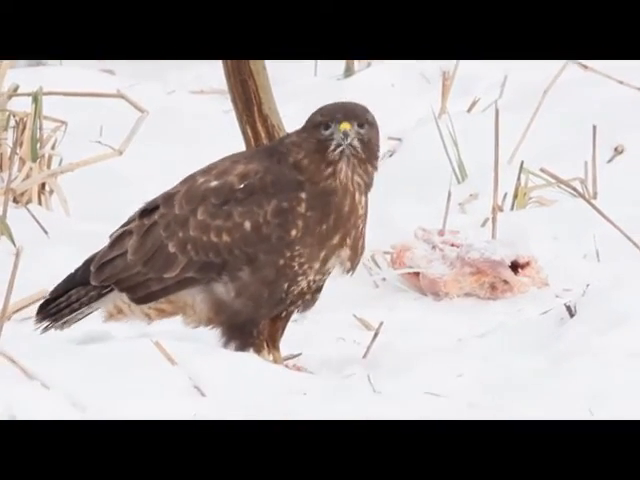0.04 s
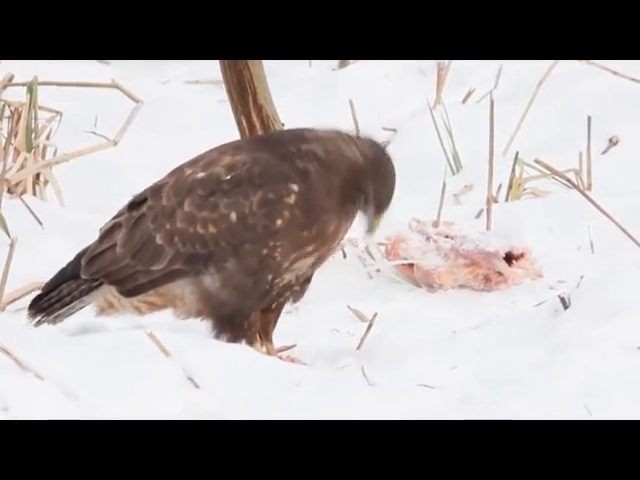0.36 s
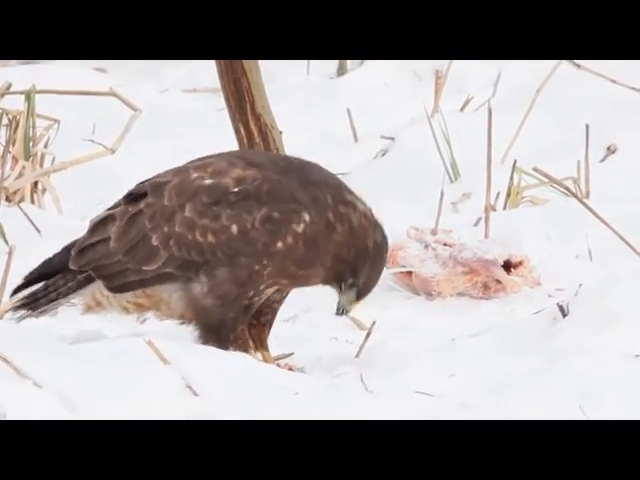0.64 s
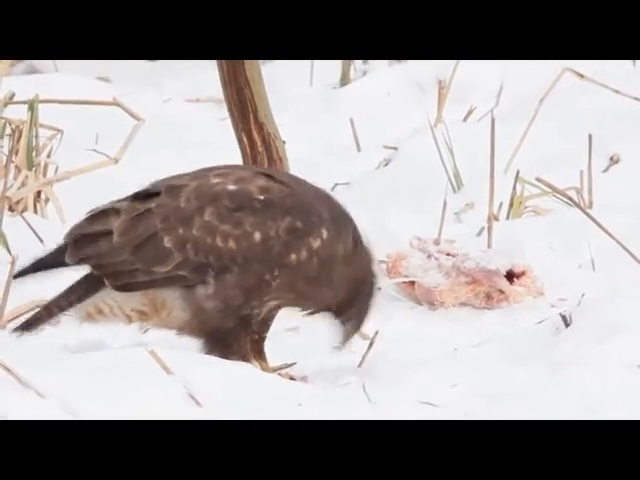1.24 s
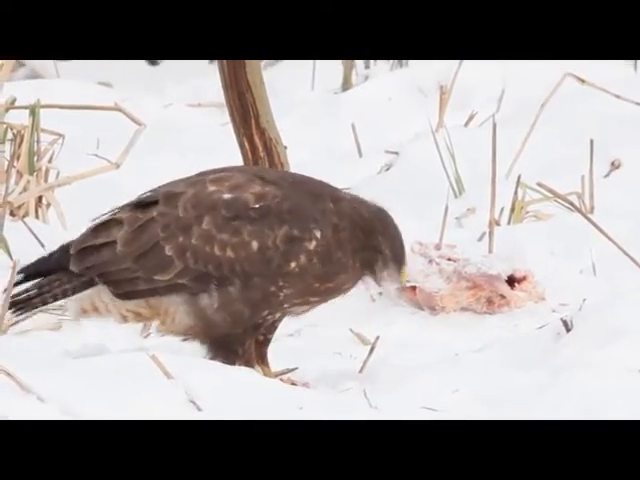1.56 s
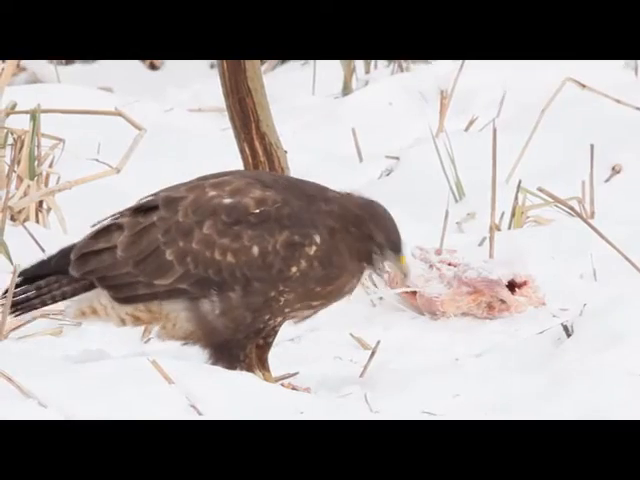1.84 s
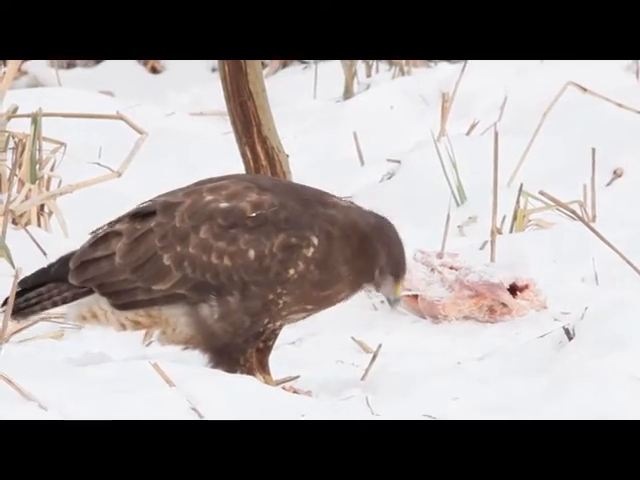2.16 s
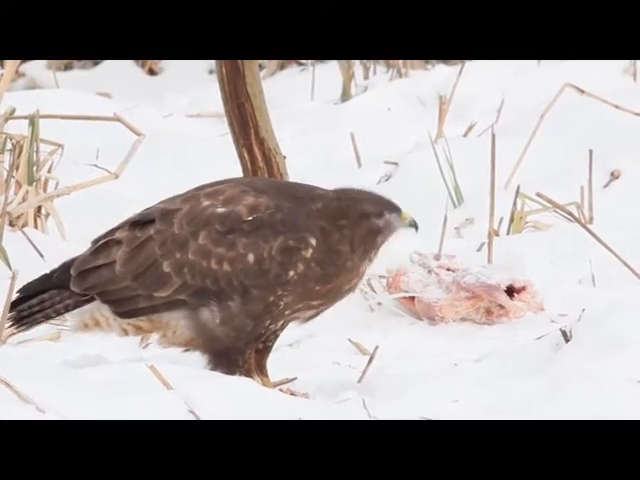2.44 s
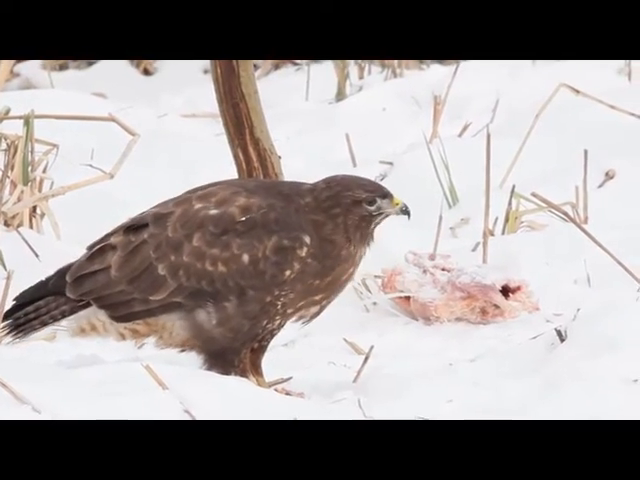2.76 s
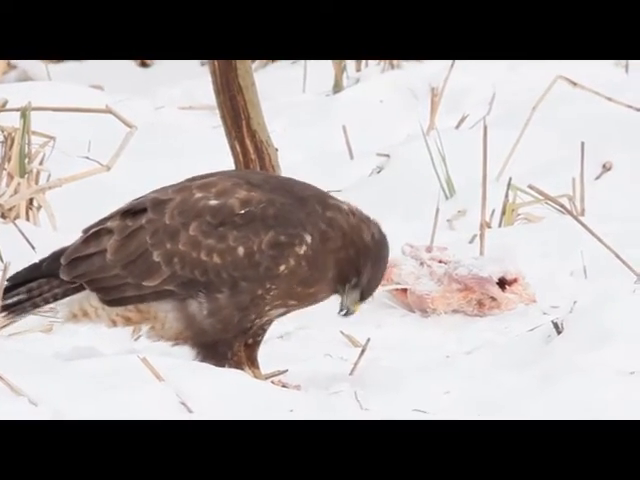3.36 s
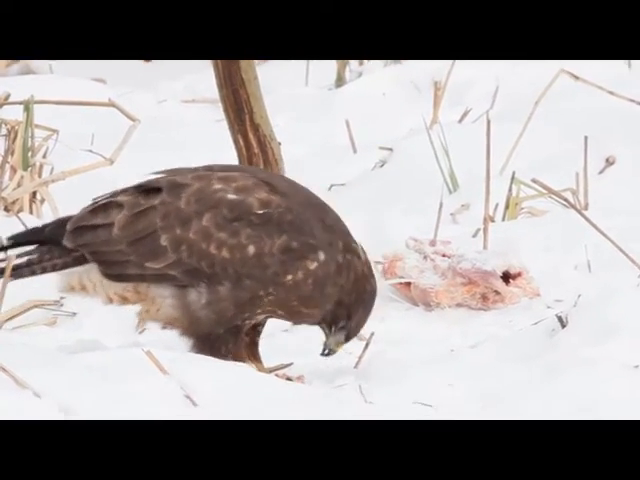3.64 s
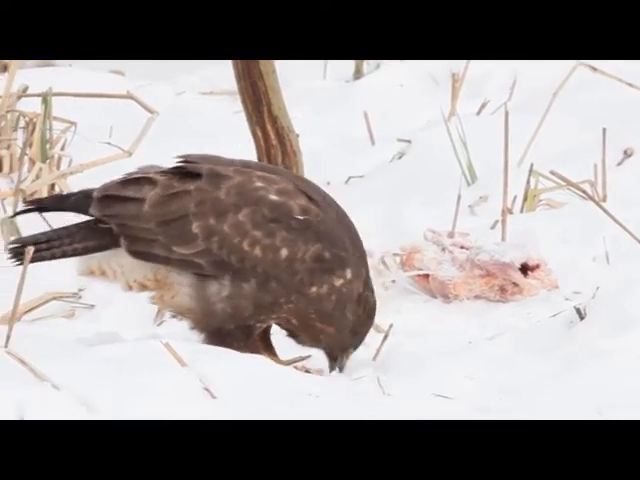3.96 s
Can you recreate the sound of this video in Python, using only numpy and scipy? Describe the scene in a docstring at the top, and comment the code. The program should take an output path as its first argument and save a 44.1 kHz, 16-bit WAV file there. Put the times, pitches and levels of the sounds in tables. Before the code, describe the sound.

A buzzard feeds in the snow, its beak making faint, scattered ticks. Near the end come a close woody tap and a sharp knock with a dull thud. Quiet outdoor hiss, a distant hum and a thin whine lie underneath.

```python
"""A buzzard feeds in the snow over hiss and a faint, far murmur with a steady hum. At the start a low tone
swells and a thin whine, probably a lens motor, sets in. Beak, food and snow crust tick as each contact
excites damped modes; from 1.2 s the bird tugs off crumbs. Near 2 s the whine frays. A high chip, probably
a small bird's whistle, and a soft knock follow. A close, woody tap at 3.2 s leads to a sharp knock with a
dull thud and a second chip. Last come two faint plinks, and the whine returns, frayed."""
import sys
import numpy as np
from scipy import signal
from scipy.fft import rfft, irfft
from scipy.io import wavfile

SR = 44100
rng = np.random.default_rng(int(sys.argv[2]) if len(sys.argv) > 2 else 0)


def dump_mix(stems):
    """Bounce the given channels to the path in sys.argv[1] as a 16-bit WAV at rate SR."""
    frames = np.atleast_2d(stems).T  # one column per channel
    limited = np.clip(frames, -1, 1)  # hard clip at full scale
    pcm = np.round(limited * 32767).astype(np.int16)
    wavfile.write(sys.argv[1], SR, pcm)


N = 176400
TIME = np.arange(N) / SR

# Contacts that excite each body: t/s, level/dB, cut-off f/Hz (higher for a harder contact)
TICK_CONTACTS = [(.0724, -31, 15000), (.0748, -39, 9000), (.163, -36, 2960), (.631, -39, 2500),
                 (.954, -39.5, 3040), (1.097, -38, 8900), (1.2435, -33.5, 8000), (1.262, -38, 6050),
                 (1.296, -44, 8000), (1.376, -41.5, 9050), (1.47, -41.5, 6000), (1.54, -37, 4970),
                 (1.646, -42, 5100), (1.743, -40, 4950), (1.905, -36.5, 2470), (1.928, -44, 8060),
                 (2.4627, -35.5, 15000), (2.907, -37.5, 6000), (2.931, -36.5, 2560), (3.466, -36, 3490),
                 (3.696, -39, 6000), (3.767, -30.5, 1490), (3.944, -38, 5000)]
KNOCK_CONTACTS = [(2.4834, -29.5, 4700), (3.3926, -11.5, 2500), (3.4011, 0, 10000)]
THUD_CONTACTS = [(.183, -21.5, 400), (2.463, -22.5, 1400), (2.484, -23, 2300), (2.4915, -24, 1040),
                 (3.3937, -8, 440), (3.4012, 0, 960)]
TAP_CONTACTS = [(.0726, -24.5, 24000), (3.2019, -4, 14000)]
# Normal modes of each body: f/Hz, relative level/dB, T60/s
TICK_MODES = [(700, -16, 0.015), (1105, -12, 0.013), (1527, -15.5, 0.019), (1910, -11, 0.008),
              (2500, -7, 0.0036), (4410, -5, 0.0018), (7600, -2, 0.0015), (12800, -5.5, 0.0009)]
KNOCK_MODES = [(560, -22, 0.019), (805, -10, 0.011), (1095, 1, 0.0037), (1410, -0.5, 0.0081),
               (2480, -7, 0.0037), (3400, -15.5, 0.0031), (4840, -20.5, 0.005), (8060, -8.5, 0.0031),
               (13500, -24, .0015), (1500, -31, .04)]
THUD_MODES = [(177.7, -14, 0.06), (229.5, -13.5, 0.034), (474, -22, 0.038), (740, -9.5, 0.0093)]
TAP_MODES = [(340, -42, 0.014), (590, -24.5, 0.013), (920, -46, 0.0065), (1430, -20, 0.011),
             (1770, -3, 0.0053), (2480, -22, 0.0043), (3090, -26, 0.017), (5170, -19.5, 0.0027),
             (6960, -30, 0.0032), (1520, -39, 0.15)]
# The small bird's whistles: t/s, level/dB, final f/Hz, duration/s
BIRD_CHIPS = [(2.4304, -33, 7030, .0105), (3.419, -36.5, 7154, 0.013)]
# Damped tones: t/s, level/dB, f/Hz, T60/s
PLINK_TONES = [(3.7807, -38.5, 3230, 0.021), (3.784, -38, 1485, 0.054)]
# Course of the motor's whine: t/s, level before filtering/dB, nominal rate of phase slips/(1/s)
WHINE_COURSE = [(0, -72, 1800), (.2, -61, 1300), (.27, -58.5, 450), (.42, -58, 150), (1.0, -57.5, 170),
                (1.35, -58, 240), (1.92, -58.5, 240), (1.99, -58, 1300), (2.25, -57.5, 1800),
                (2.55, -66, 2500), (3.7, -81, 2500), (4, -58, 1400)]
# Resonances of the motor's idle fizz: f/Hz, bandwidth/Hz, relative level/dB
FIZZ_RESONANCES = [(6180, 370, -3.5), (6660, 830, -2), (7700, 650, -3), (8280, 300, -9), (8970, 1100, -1),
                   (10160, 720, -6), (11040, 170, -9)]
# Envelopes of the fizz and of the far, low tone: t/s, level/dB
FIZZ_ENVELOPE = [(0, -66), (.2, -68.5), (.45, -83), (1.8, -71), (2.2, -72), (2.55, -66), (3.6, -65),
                 (4, -66.5)]
SWELL_ENVELOPE = [(0, -86), (.12, -55), (.22, -60), (.36, -50.5), (.44, -63), (4, -62)]
# Spectral lines of the hum: f/Hz, rms level/dB, width of wander/Hz
HUM_LINES = [(215, -64, 10.04), (499, -66, 16.7), (684.2, -56.5, 1.9), (863.4, -62.5, 1.35)]
# Spectral densities of the far murmur and the hiss: f/Hz, relative level/dB
MURMUR_SPECTRUM = [(25, -32), (50, -7), (80, -5.5), (125, -12), (170, -5), (215, -1.5), (270, -1.5),
                   (370, 1.5), (480, 0.5), (620, -0.5), (820, 4), (950, -1), (1100, -10.5), (1500, -12),
                   (2200, -25)]
HISS_SPECTRUM = [(1200, -6), (2000, -2), (3000, -3.5), (5000, -6), (8000, -11), (10500, -8.5),
                 (12000, -17.5), (15000, -22.5), (20000, -25)]


def buzzard_feeding(crumb_count=18, tug_start_s=1.2, tug_length_s=0.69):
    """Impact excitation: beak, food and snow crust tick, and tugging adds faint crumbs at random."""
    crumbs = [(tug_start_s + tug_length_s * when, -49 + 7 * (2 * size - 1), 8000)  # t/s, level/dB, f/Hz
              for when, size in rng.random((crumb_count, 2))]
    return struck(TICK_CONTACTS + crumbs, TICK_MODES, grit=0.15)


def knock(crack_db=-7, crack_decay_s=0.0012):
    """Modal ringing with a brittle crack of noise; the harder the contact, the wider its spectrum."""
    ringing = struck(KNOCK_CONTACTS, KNOCK_MODES)
    crack = 0
    for start, db, cut_hz in KNOCK_CONTACTS:
        decay = (TIME >= start) * np.exp(-np.maximum(TIME - start, 0) / crack_decay_s)
        crack += from_db(db + crack_db) * low_pass(decay * rng.standard_normal(N), cut_hz)
    return ringing + butterworth(crack, (3450, 7740), "band", order=3)


def woody_tap():
    """Free vibration: a hard contact sets a woody body ringing in quickly damped modes."""
    return struck(TAP_CONTACTS, TAP_MODES)


def snow_thuds():
    """A soft contact spreads its force over time, so the snow answers dully, in low modes."""
    return struck(THUD_CONTACTS, THUD_MODES)


def impacts():
    """Superposition: all contacts, their bass cut, sound together with their reflections."""
    direct = knock() + snow_thuds() + woody_tap() + buzzard_feeding()
    direct = butterworth(direct, 234, "high")
    near_echoes = from_db(-16) * reflections(direct, t60=0.022, cut_hz=4200)
    trunks_and_reeds = from_db(-36) * reflections(direct, t60=0.13, cut_hz=3400)
    return direct + near_echoes + trunks_and_reeds


def small_bird(rise_hz=1000, rise_s=0.0023, roughness=0.44):
    """Frequency modulation: each chip is a rough whistle that flicks up to its pitch, then echoes."""
    chips = 0
    for start, db, hz, length in BIRD_CHIPS:
        t = np.maximum(TIME - start, 0)
        phase = 2 * np.pi * np.cumsum(hz - rise_hz * np.exp(-t / rise_s)) / SR
        envelope = np.sin(np.pi * np.minimum(t / length, 1) ** 1.03)
        chips += from_db(db) * envelope * (np.sin(phase) + roughness * band_noise(hz, 800))
    return chips + from_db(-10.5) * reflections(chips, t60=0.063, cut_hz=12000)


def plinks(attack_s=0.0012):
    """Damped oscillation: each plink is a sinusoid that starts softly and decays exponentially."""
    tones = 0
    for start, db, hz, t60 in PLINK_TONES:
        t = np.maximum(TIME - start, 0)
        envelope = (1 - np.exp(-t / attack_s)) * np.exp(-np.log(1000) * t / t60)
        tones += from_db(db) * envelope * np.sin(2 * np.pi * hz * t)
    return tones


def lens_motor(whine_hz=9784, slip_spread_rad=0.99, cluster_db=7):
    """Line broadening: the more often its phase slips, the more the whine frays into the idle fizz."""
    times, whine_db, slip_rate = np.transpose(WHINE_COURSE)
    clustering = from_db(cluster_db * band_noise(0, width_hz=61.3))
    slips = rng.random(N) < np.interp(TIME, times, slip_rate) * clustering / SR
    jumps = slips * (np.pi + slip_spread_rad * rng.standard_normal(N))
    phase = 2 * np.pi * whine_hz * TIME + np.cumsum(jumps)
    whine = butterworth(np.sqrt(2) * np.sin(phase), (8400, 10400), "band")
    fizz = sum(from_db(db) * band_noise(hz, width) for hz, width, db in FIZZ_RESONANCES)
    return from_db(np.interp(TIME, times, whine_db)) * whine + gain_curve(FIZZ_ENVELOPE) * fizz


def background():
    """Line spectra (a hum, one swelling tone) stand on continuous spectra (far murmur, even hiss)."""
    hum = sum(from_db(db) * wandering_tone(hz, width) for hz, db, width in HUM_LINES)
    swell = gain_curve(SWELL_ENVELOPE) * wandering_tone(482, width_hz=27)
    murmur = from_db(-50.5) * coloured_noise(MURMUR_SPECTRUM)
    hiss = from_db(-61) * coloured_noise(HISS_SPECTRUM)
    return hum + swell + murmur + hiss


def struck(contacts, modes, grit=0, grit_decay_s=0.0056):
    """Modal superposition: force pulses, with any crumbling grit after them, drive a body's modes."""
    force, t = np.zeros(N + SR), TIME[:SR // 20]
    for start_s, db, cut_hz in contacts:
        pulse = grit * rng.standard_normal(len(t)) * np.exp(-t / grit_decay_s)
        pulse[0] = 1
        start = int(start_s * SR)
        force[start:start + len(t)] += from_db(db) * low_pass(pulse, cut_hz)
    return sum((-1) ** k * from_db(db) * resonator(force[:N], hz, t60)
               for k, (hz, db, t60) in enumerate(modes))


def resonator(force, hz, t60):
    """A damped oscillator: a unit impulse starts a decaying sinusoid of unit amplitude."""
    radius, angle = np.exp(-np.log(1000) / (t60 * SR)), 2 * np.pi * hz / SR
    return signal.lfilter([0, np.sin(angle)], [1, -2 * radius * np.cos(angle), radius ** 2], force + 1e-18)


def reflections(x, t60, cut_hz):
    """Diffuse scattering: convolution with a dense, dying cloud of echoes of unit energy."""
    t = TIME[:SR // 2]
    envelope = (1 - np.exp(-t / 0.0047)) * np.exp(-np.log(1000) * t / t60)
    cloud = envelope * low_pass(rng.standard_normal(len(t)), cut_hz)
    return signal.fftconvolve(x, cloud / np.sqrt(np.sum(cloud ** 2)))[:N]


def wandering_tone(hz, width_hz):
    """Random frequency modulation of a sinusoid of unit rms."""
    pitch_hz = hz + 0.5 * width_hz * band_noise(0, 22.6)
    return np.sqrt(2) * np.sin(2 * np.pi * np.cumsum(pitch_hz) / SR)


def band_noise(centre_hz, width_hz):
    """Resonance, applied twice, confines noise to a band; centred on 0 Hz it is a slow fluctuation."""
    return shaped_noise(lambda hz: 1 / (1 + (2 * (hz - centre_hz) / width_hz) ** 2))


def coloured_noise(spectrum):
    """Noise whose spectral density follows a table and rolls off beyond its ends."""
    f, db = np.transpose(spectrum)

    def gain_at(hz):
        roll_off = np.sqrt((1 + (1.1 * f[0] / hz) ** 10) * (1 + (0.72 * hz / f[-1]) ** 10))
        return from_db(np.interp(np.log(hz), np.log(f), db)) / roll_off
    return shaped_noise(gain_at)


def shaped_noise(gain_at):
    """Spectral weighting of white noise, scaled to unit rms."""
    hz = np.maximum(np.arange(N // 2 + 1) * SR / N, 1)
    noise = irfft(rfft(rng.standard_normal(N)) * gain_at(hz), N)
    return noise / np.sqrt(np.mean(noise ** 2) + 1e-20)


def butterworth(x, hz, kind, order=2):
    """Filtering with a maximally flat passband."""
    return signal.sosfilt(signal.butter(order, hz, kind, fs=SR, output="sos"), x)


def low_pass(x, hz):
    """Second-order roll-off, its corner kept below the Nyquist frequency."""
    return butterworth(x + 1e-18, min(hz, 0.45 * SR), "low")


def gain_curve(rows):
    """Amplitude envelope interpolated from rows of t/s, level/dB."""
    return from_db(np.interp(TIME, *np.transpose(rows)))


def from_db(db):
    """Amplitude ratio for a level in decibels."""
    return 10 ** (np.asarray(db) / 20)


def scene():
    """Linear superposition of all sources at one point."""
    return (background() + lens_motor() + impacts() + plinks() + small_bird())[None]


def record(dry):
    """Band limiting: a steep elliptic low-pass removes the treble above 15.5 kHz."""
    return signal.sosfilt(signal.ellip(10, 0.1, 80, 15500, fs=SR, output="sos"), dry)


dry = scene()
out = record(dry)
dump_mix(out)
```